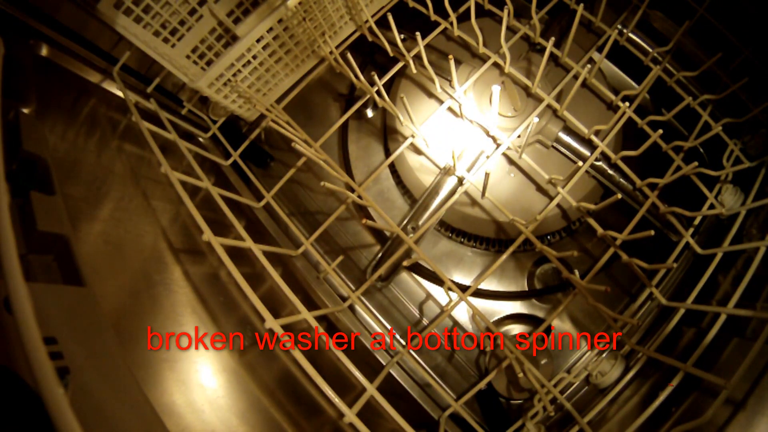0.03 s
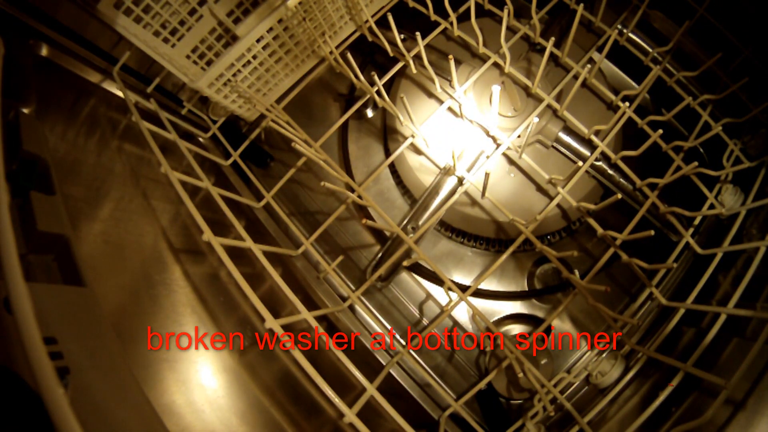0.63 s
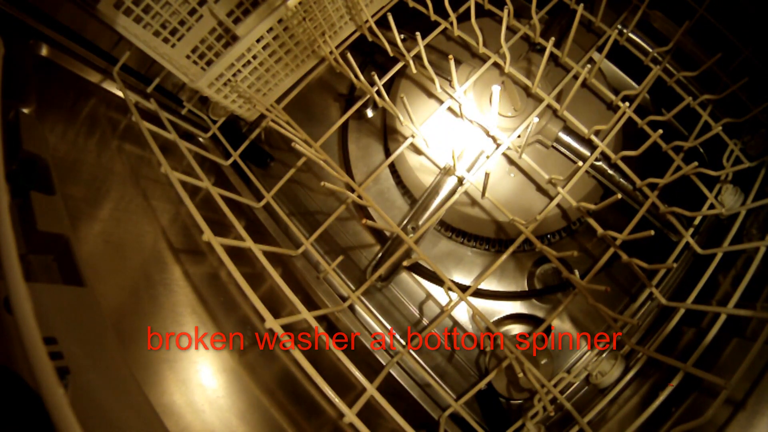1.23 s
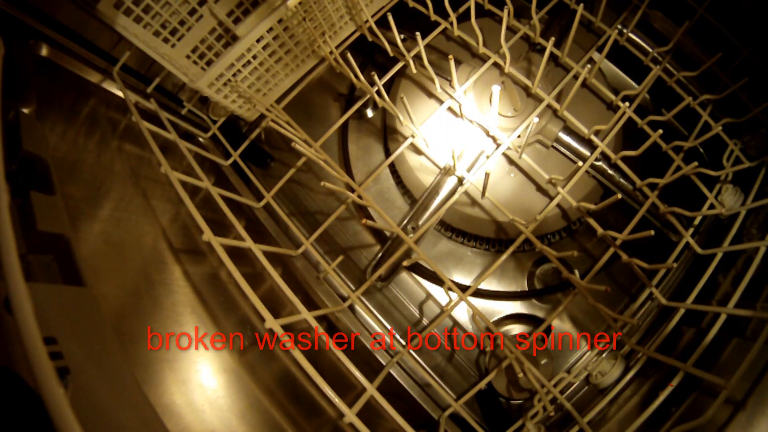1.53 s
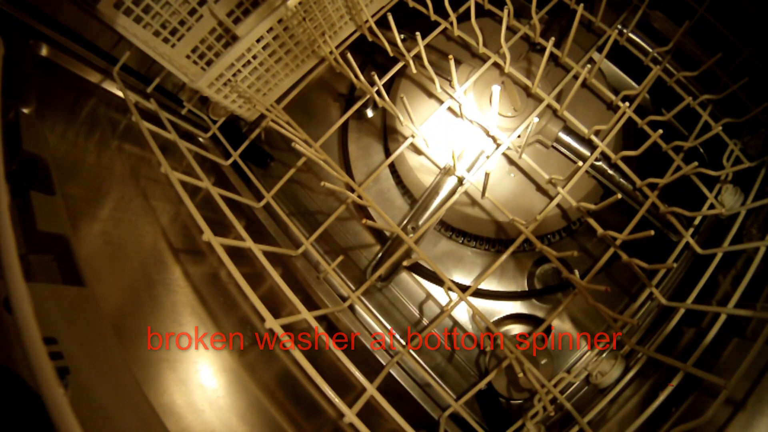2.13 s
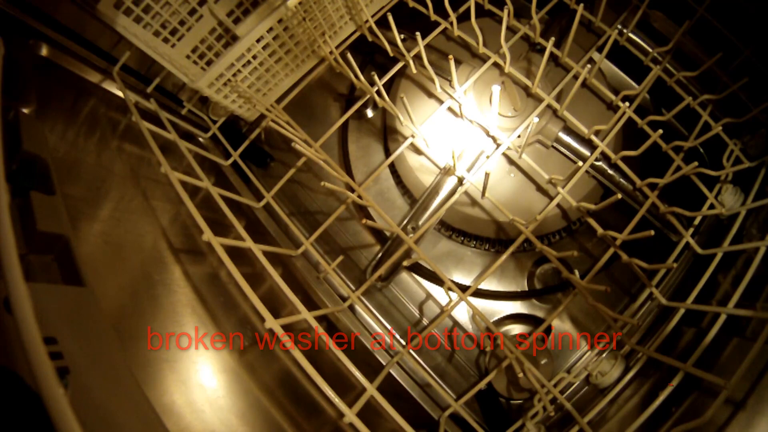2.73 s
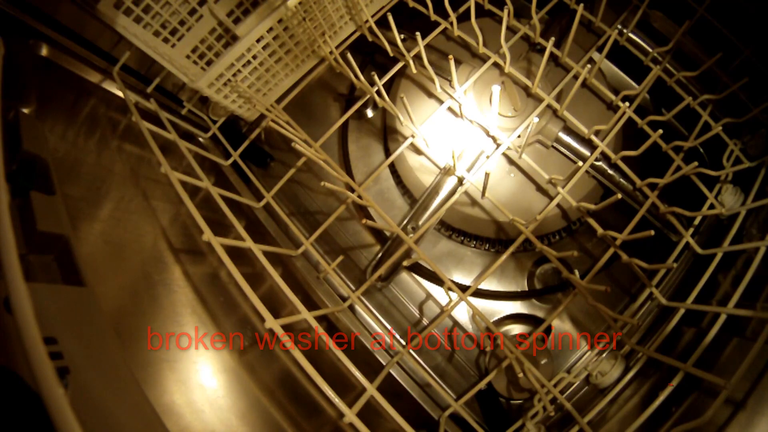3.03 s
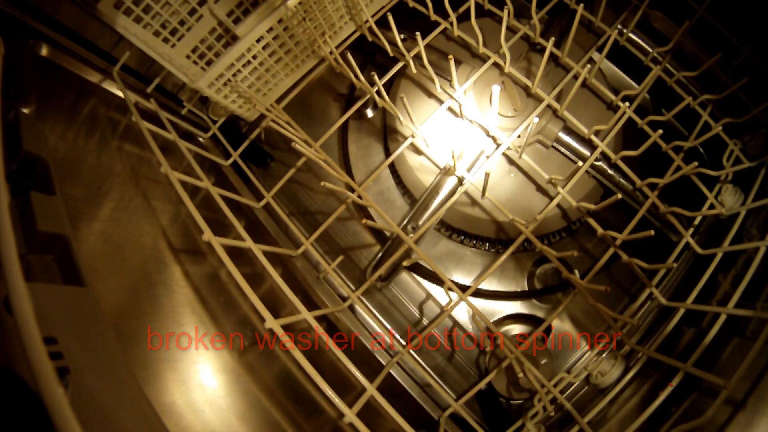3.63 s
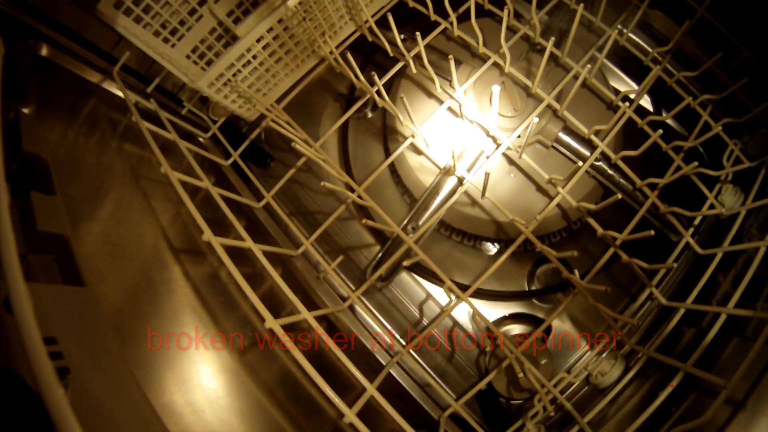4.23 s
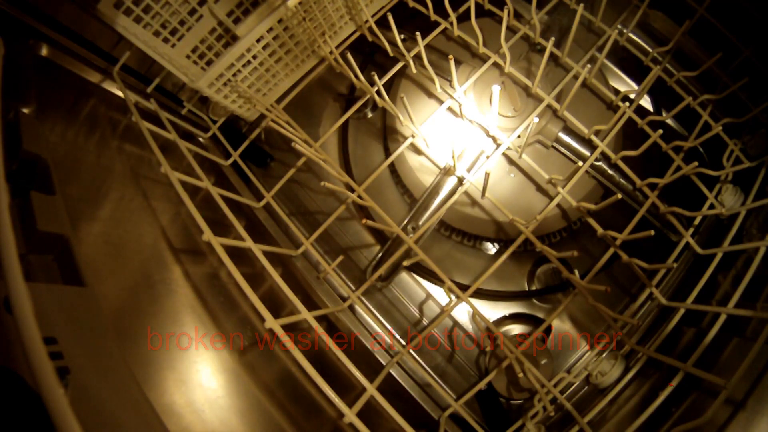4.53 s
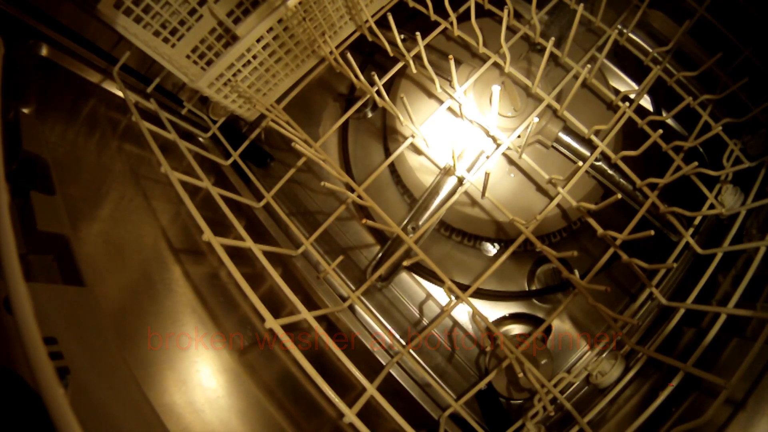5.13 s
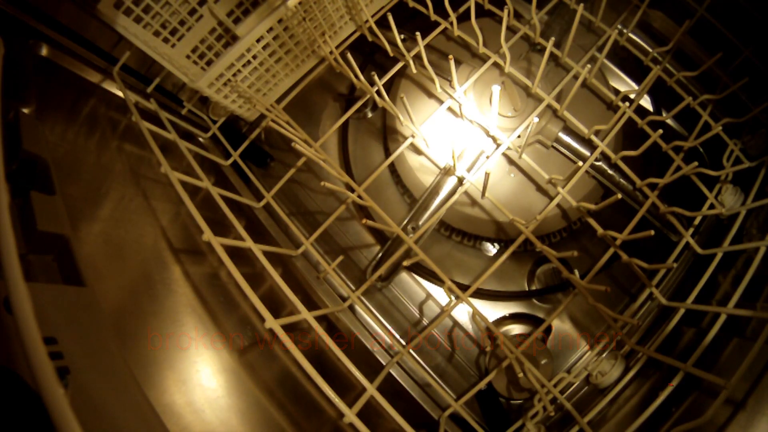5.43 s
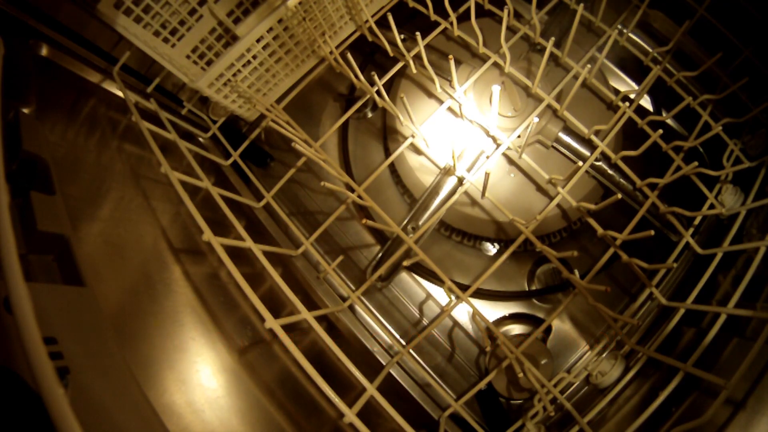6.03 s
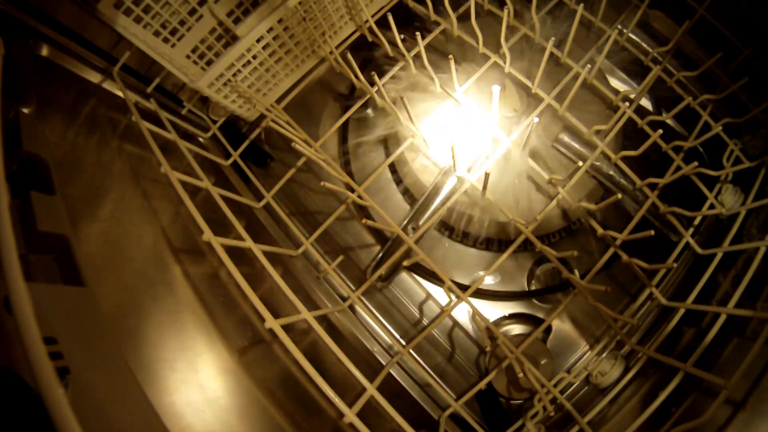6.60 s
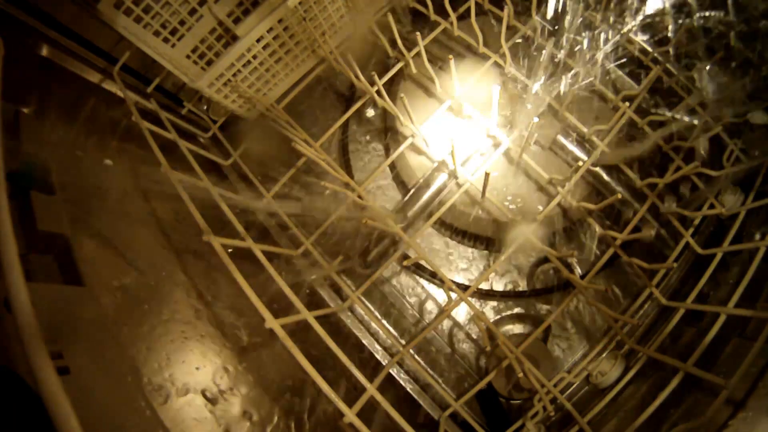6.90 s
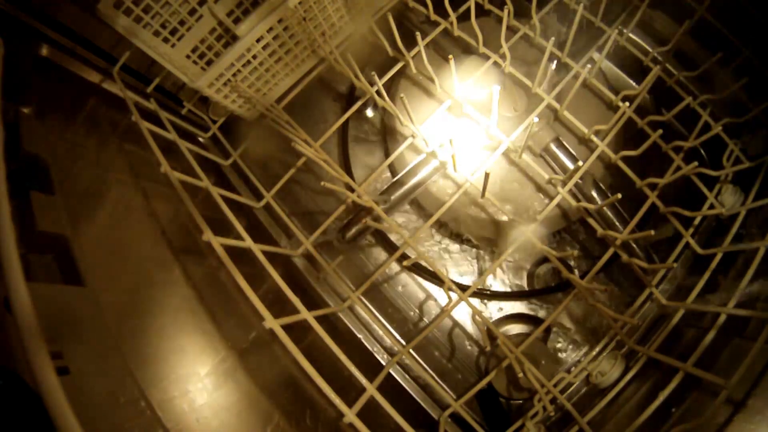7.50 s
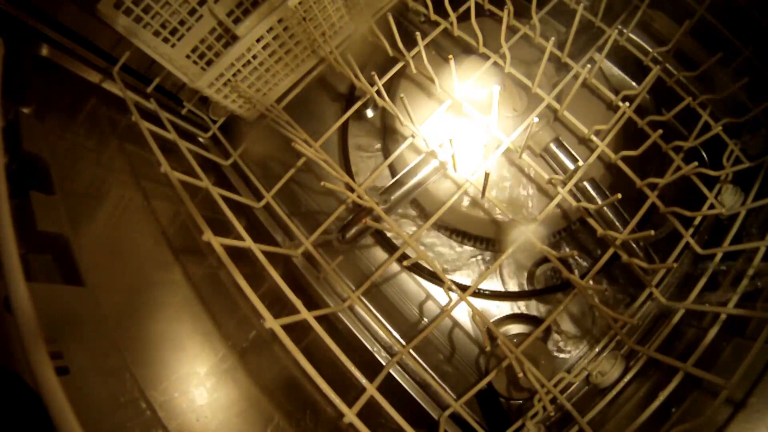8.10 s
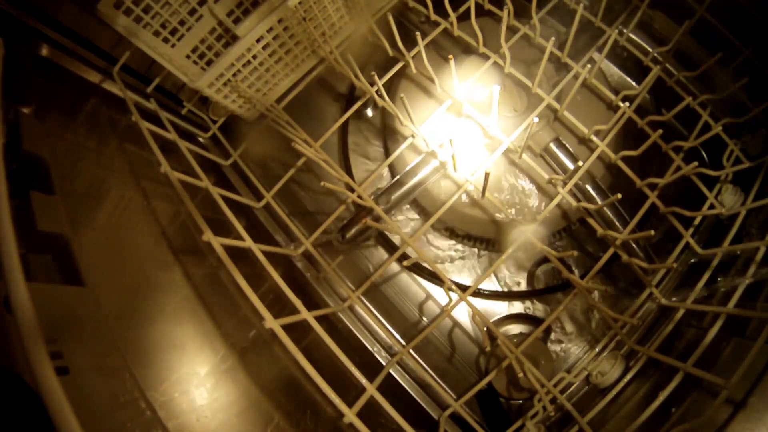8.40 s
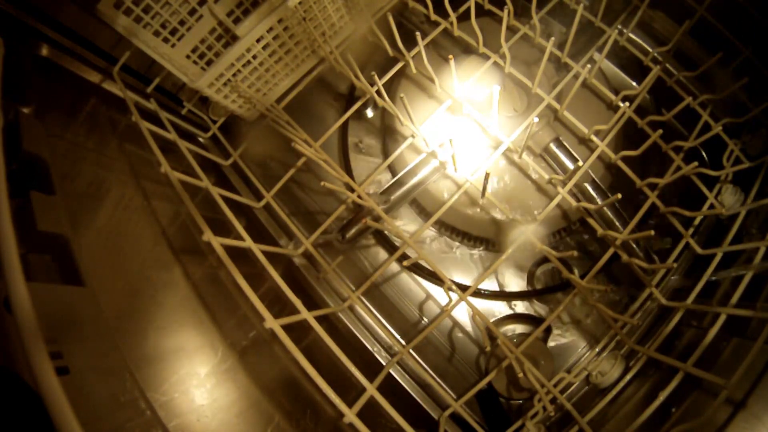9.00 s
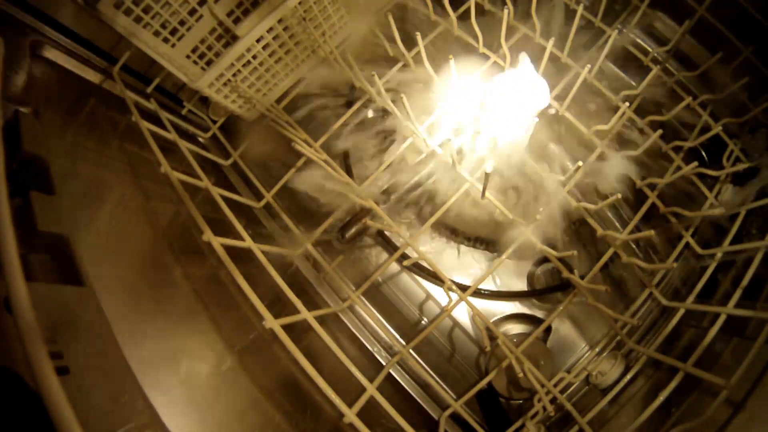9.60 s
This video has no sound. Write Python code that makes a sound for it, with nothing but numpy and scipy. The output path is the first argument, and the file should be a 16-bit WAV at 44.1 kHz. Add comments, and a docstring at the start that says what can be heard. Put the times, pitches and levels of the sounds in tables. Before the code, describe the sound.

Heard from a small microphone inside a dishwasher tub, a quiet hum and small plinking drips stop suddenly for a few seconds of near silence. Then the wash pump thumps on and water spits and surges loudly, spattering the racks and drumming on the steel. It eases into an even, slightly glassy spray over the droning pump, with a few hollow booms from the panels.

```python
"""Inside a steel dishwasher tub, water drips into the sump over a low hum; both stop abruptly at 3.9 s.
After a pause on faint hiss they return at 6.4 s, and the wash pump starts with a thump.
The jets spit and sweep across racks and walls, slam into the steel near 7 s, then settle to a
steady spray over the pump's drone. Throughout, a small camera in the tub samples the sound
coarsely, which mirrors it into a glassy treble."""
import sys
import numpy as np
from scipy import signal
from scipy.fft import rfft, irfft
from scipy.io import wavfile

SR = 44100
rng = np.random.default_rng(int(sys.argv[2]) if len(sys.argv) > 2 else 0)


def inscribe(sig):
    """Save sig as 16-bit PCM at rate SR to the path in sys.argv[1].

    A 1-D sig is mono; a 2-D sig holds one channel per row.
    Samples are clipped to [-1, 1] before scaling.
    """
    pcm = np.round(np.clip(np.atleast_2d(sig).T, -1, 1) * 32767)
    wavfile.write(sys.argv[1], SR, pcm.astype(np.int16))


N = 429975
TIME_S = np.arange(N) / SR

# Background spectra. Each row: frequency in Hz, relative level in dB.
HISS_SPECTRUM = [(30, 3.5), (70, -1), (150, -3.5), (400, -11.5), (1000, -16.5), (2500, -20), (5600, -24.5)]
RUMBLE_SPECTRUM = [(18, -15), (28, 3.5), (36, 1), (46, -8), (60, -12)]
IDLE_SPECTRUM = [(22, -5), (60, 1.5), (120, -0.5), (250, 1.5), (450, 0.5), (700, -3), (930, -7),
                 (1060, -16), (1350, -0.5), (1700, -15), (2100, -6.5), (2550, -17.5), (2800, -32),
                 (3300, -37), (5600, -24)]
# Tub resonances at idle. Each row: frequency in Hz, width in Hz, relative level in dB.
TUB_MODES = [(75.4, 2.7, 3.5), (918, 15, -8.5), (1250, 6.8, -9.5), (1426, 25, -16), (2200, 17, -15),
             (2460, 100, -3), (2568, 20, 0)]
# Idling motor. Each row: frequency in Hz, relative level in dB.
MOTOR_TONES = [(32.3, -69.5), (75.4, -55.5), (118.4, -67), (328.4, -68.5), (403.7, -64), (446.8, -68.5),
               (489.9, -82), (511.4, -73.5), (635.2, -69.5), (721.4, -80), (775.2, -84)]
# Drops into the sump. Each row: start in seconds, bubble pitch in Hz, relative level in dB.
DRIPS = [(0.176, 2470, -49.5), (0.269, 2570, -47), (0.314, 2190, -51), (0.416, 2260, -47),
         (0.427, 2600, -46), (0.553, 5200, -66.5), (0.608, 2200, -59.5), (0.905, 2410, -53.5),
         (1.017, 2560, -50.5), (1.105, 3300, -68), (1.215, 5130, -58), (1.393, 3160, -53),
         (1.631, 2800, -50.5), (1.687, 2580, -49.5), (1.77, 1880, -56), (1.886, 2300, -53.5),
         (1.943, 2210, -52), (2.033, 5006, -68), (2.135, 4661, -67), (2.43, 3750, -61.5),
         (2.48, 5050, -63.5), (2.527, 1510, -52), (2.567, 2550, -51.5), (2.6, 2196, -57.5),
         (2.99, 3460, -59.5), (3.295, 4737, -62.5), (3.37, 3560, -65), (3.405, 4166, -66),
         (3.448, 2460, -51), (3.49, 2160, -48), (3.762, 2730, -49), (3.846, 2920, -51.5),
         (6.433, 2360, -59.5), (8.381, 5404, -54), (8.577, 5230, -51), (8.755, 5400, -64),
         (8.908, 5270, -53), (9.568, 5400, -48)]
# Pump load, sagging as it gulps air. Each row: time in seconds, drone base level in dB.
PUMP_LOAD = [(7.3, -25.5), (7.35, -25.5), (8.08, -24.5), (9.51, -29.5), (9.7, -28.5), (9.75, -25)]
# Impeller harmonics. Each row: multiple of the rotation rate, relative level in dB.
PUMP_ORDERS = [(1, 0.5), (2, -8), (3, -11.5), (4, -7), (5, -14.5), (6, -19.5), (7, -23), (8, -20.5),
               (9, -22)]
# Jet flow, overshooting then settling. Each row: time in seconds, flow in dB above steady.
JET_FLOW = [(6.42, -47), (6.5, -18), (6.6, -1.5), (6.7, 5.5), (6.85, 8.5), (7.15, 6.5), (7.28, -1),
            (7.9, -0.5), (8.7, .5), (9.75, .5)]
# Water spectra. Each row: frequency in Hz, relative level in dB.
SURGE_SPECTRUM = [(22, -24), (32, -9), (45, 0), (65, -1), (100, -1), (160, -28)]
WALL_SPECTRUM = [(240, -18), (360, -7.5), (490, 0.5), (555, -2), (650, 2.5), (780, -3), (950, 0.5),
                 (1130, -15), (1500, -18)]
PANEL_SPECTRUM = [(45, -17), (75, -23), (110, -4), (150, 0), (200, -1), (260, -8), (400, -10.5)]
SPLASH_SPECTRUM = [(950, -25), (1110, -10), (1240, -1), (1630, 0.5), (1950, 1.5), (2400, -7), (3000, -35)]
PATTER_SPECTRUM = [(1120, -33), (1900, -12.5), (2030, -14.5), (2210, -1), (2530, 0), (3420, -16.5),
                   (4350, -23.5), (5330, -18), (5600, -20.5), (7280, -64), (12300, -120)]
CRACKLE_SPECTRUM = [(2500, -32), (3500, 0), (5000, 2), (7000, -9)]
# Resonances under the water. Each row: frequency in Hz, width in Hz, relative level in dB.
WALL_MODES = [(436, 14, 3), (464.4, 13, -2), (501, 12, -1.5), (628.4, 8.4, 4.5), (757, 4.3, -7),
              (921, 15, 3), (1055, 9.4, -26), (1621, 50, -2.5)]
PANEL_MODES = [(114.8, 4.2, 0), (171, 6.5, 1), (223, 11, -14.5), (286.7, 7.6, -5)]
SUMP_MODES = [(1619, 43, -2)]
RACK_MODES = [(2475, 86, 1.5), (2580, 54, -1)]
# Jets passing a panel. Each row: peak time in seconds, hold in seconds, pitch in Hz, level in dB.
PANEL_BOOMS = [(6.74, 0.12, 120, -14.5), (6.925, 0.016, 120, -18), (7.032, .004, 121, -17.5),
               (7.102, 0.0033, 125, -16.5), (8.665, 0.018, 117.5, -24), (8.67, 0.018, 175, -24),
               (8.939, 0.021, 116.5, -19.5), (8.985, 0.019, 171.4, -22), (9.07, .025, 173, -25.5),
               (9.195, .01, 116, -21), (9.52, .015, 171, -25.5), (9.65, 0.012, 175, -28)]
# Heavy slugs of water. Each row: peak time in seconds, level in dB.
SLUG_THUDS = [(6.965, -20), (7.14, -23.5), (7.2, -21), (7.3, -24)]
# Water landing in the sump. Each row: peak time in seconds, hold in seconds, level in dB.
SUMP_SPLASHES = [(6.71, .015, -32.5), (6.95, .11, -29), (7.08, 0.01, -24), (7.2, 0.0078, -28.5),
                 (7.37, .01, -25), (7.54, .02, -33.5), (7.649, 0.012, -31.5)]
# Jets crossing the racks. Each row: peak time in seconds, hold in seconds, level in dB.
RACK_SWEEPS = [(6.673, 0.0058, -22), (6.921, 0.095, -17.5), (7.22, 0.0067, -29.5), (7.329, .01, -30),
               (7.435, 0.014, -27.5), (7.54, .02, -32.5), (7.65, .015, -35.5), (9.713, .02, -32)]


def from_db(db):
    """Decibels to gain."""
    return 10 ** (np.asarray(db) / 20)


def unit_rms(x):
    """Scale to rms 1."""
    return x / np.sqrt(np.mean(x ** 2) + 1e-20)


def power_sum(*gains):
    """Joint gain of unrelated sounds."""
    return np.sqrt(sum(gain ** 2 for gain in gains))


def curve(rows):
    """Breakpoints interpolated to every sample."""
    return np.interp(TIME_S, *np.transpose(rows))


def swell(peak_s, rise_s, hold_s=0, fall_db_per_s=0):
    """Gain that rises smoothly to 1, holds, then falls at the given rate."""
    rise = np.clip(1 + (TIME_S - peak_s) / rise_s, 0, 1)
    falling_s = np.clip(TIME_S - peak_s - hold_s, 0, 2)
    return np.sin(np.pi / 2 * rise) ** 2 * from_db(-fall_db_per_s * falling_s)


def noise():
    """White noise."""
    return rng.standard_normal(N)


def drift(rate_hz, knots=8192):
    """Smooth random wander; rms 1."""
    hz = np.arange(knots // 2 + 1) * SR / N
    slow = irfft(rfft(rng.standard_normal(knots)) / (1 + (hz / rate_hz) ** 2), knots)
    return np.interp(TIME_S, np.linspace(0, N / SR, knots), unit_rms(slow))


def impacts(per_s, spread_db):
    """Drops of uneven size landing at random; rms 1."""
    sizes = from_db(spread_db * np.minimum(rng.exponential(1, N), 4)) * rng.choice([-1, 1], N)
    return unit_rms(sizes * (rng.random(N) < per_s / SR))


def colour(x, spectrum):
    """Filter by a spectrum, with steep skirts past its ends; rms 1."""
    hz = np.maximum(np.arange(N // 2 + 1) * SR / N, 1)
    points_hz, points_db = np.transpose(spectrum)
    skirts = np.minimum(1, np.minimum(hz / points_hz[0], points_hz[-1] / hz)) ** 6
    gain = from_db(np.interp(np.log(hz), np.log(points_hz), points_db))
    return unit_rms(irfft(rfft(x) * skirts * gain, N))


def resonate(x, modes):
    """Parallel two-pole resonances; rms 1."""
    out = 0
    for hz, width_hz, db in modes:
        radius = np.exp(-np.pi * width_hz / SR)
        feedback = [1, -2 * radius * np.cos(2 * np.pi * hz / SR), radius ** 2]
        out += from_db(db) * unit_rms(signal.lfilter([1, 0, -1], feedback, x))
    return unit_rms(out)


def tub(x, direct_db, t60_s=0.29):
    """Direct sound plus dense, short reflections off the steel walls."""
    t = TIME_S[:SR // 2]
    echoes = rng.standard_normal(len(t)) * from_db(-60 * t / t60_s)
    echoes /= np.linalg.norm(echoes)
    echoes[0] += from_db(direct_db)
    return signal.fftconvolve(x, echoes / np.linalg.norm(echoes))[:len(x)]


def background(hiss_db=-61, rumble_db=-60):
    """Constant faint hiss and rumble."""
    hiss = from_db(hiss_db) * colour(noise(), HISS_SPECTRUM)
    return hiss + from_db(rumble_db) * colour(noise(), RUMBLE_SPECTRUM)


def idle(rush_db=-58, ring_db=-59.5, tone_trim_db=-1, waver=0.35):
    """Motor tones, the upper ones wavering more, over a soft rush and the tub's resonances."""
    rush = from_db(rush_db) * colour(tub(noise(), direct_db=-3.5), IDLE_SPECTRUM)
    hum, top_hz = 0, MOTOR_TONES[-1][0]
    for hz, db in MOTOR_TONES:
        shake = 1 + waver * np.sqrt(hz / top_hz) * drift(rate_hz=7)
        hum += from_db(db + tone_trim_db) * shake * np.sin(2 * np.pi * (hz * TIME_S + rng.random()))
    return np.sqrt(2) * hum + rush + from_db(ring_db) * resonate(noise(), TUB_MODES)


def drips(decay_cycles=3.54, glide=0.023, trim_db=-0.5, splat_db=-19):
    """Each drop traps a bubble that rings a few cycles, rising in pitch, with a short bright splat."""
    out, t = np.zeros(N + SR), TIME_S[:SR // 3]
    splat_band = signal.butter(2, [2500, 4600], "band", fs=SR, output="sos")
    for start_s, hz, db in DRIPS:
        age = t * hz / decay_cycles
        pitch_hz = hz * (1 + glide * (0.5 - np.exp(-age)))
        bubble = np.sin(2 * np.pi * np.cumsum(pitch_hz) / SR)
        splat = from_db(splat_db) * unit_rms(signal.sosfilt(splat_band, rng.standard_normal(len(t))))
        envelope = (1 - np.exp(-2 * age)) * np.exp(-age)
        plink = tub((bubble + splat) * envelope, direct_db=-19)
        start = round(start_s * SR)
        out[start:start + len(t)] += from_db(db + trim_db) * plink / np.std(plink[:SR // 25])
    return out[:N]


def motor_jolt(mains_hz=60, level_db=-24, buzz_db=-11):
    """The pump motor kicks at mains frequency as it starts."""
    phase = 2 * np.pi * mains_hz * TIME_S
    buzz = np.sin(2 * phase) + np.sin(4 * phase) / 2
    kick = from_db(level_db) * swell(peak_s=6.495, rise_s=0.041, hold_s=0.018, fall_db_per_s=280)
    return np.sqrt(2) * kick * (np.sin(phase) + from_db(buzz_db) * buzz)


def pump(rotation_hz=58.4, wobble_hz=0.433, flutter=0.21, primed_s=7.27):
    """Impeller drone once the pump has filled; churning water shakes the upper orders most."""
    turns = np.cumsum(rotation_hz + wobble_hz * drift(rate_hz=5.32)) / SR
    drone = 0
    for order, db in PUMP_ORDERS:
        shake = 1 + flutter * min(order / 3, 1) * drift(rate_hz=3.5)
        drone += from_db(db) * shake * np.sin(2 * np.pi * (order * turns + rng.random()))
    return np.sqrt(2) * from_db(curve(PUMP_LOAD)) * drone * swell(primed_s, rise_s=0.19)


def panel_booms(roughness=0.082):
    """A panel hums on one mode while a jet plays on it."""
    out = 0
    for peak_s, hold_s, hz, db in PANEL_BOOMS:
        tone = np.sqrt(2) * np.sin(2 * np.pi * (hz * (TIME_S - peak_s) + rng.random()))
        out += from_db(db) * swell(peak_s, rise_s=0.036, hold_s=hold_s, fall_db_per_s=260) * tone
    return out * (1 + roughness * drift(rate_hz=27))


def surge(flow_db, steady_db=-36.5):
    """Deep rumble of moving water, with a thud per heavy slug."""
    thuds = [from_db(db) * swell(peak_s, rise_s=0.044, hold_s=0.015, fall_db_per_s=200)
             for peak_s, db in SLUG_THUDS]
    return power_sum(from_db(steady_db + 0.36 * flow_db), *thuds) * colour(noise(), SURGE_SPECTRUM)


def slam(level_db, fall_db_per_s):
    """Gain of a part struck by the full jet."""
    return from_db(level_db) * swell(6.972, rise_s=0.0091, hold_s=0.095, fall_db_per_s=fall_db_per_s)


def steel(flow_db, wall_db=-39, panel_db=-35, wall_ring_db=-3.5, panel_ring_db=-1):
    """Slugs of water wash the walls and drum on the large panels, which ring longer after the slam."""
    slugs = impacts(per_s=2500, spread_db=3)
    walls = colour(tub(slugs, direct_db=5.5), WALL_SPECTRUM)
    walls += from_db(wall_ring_db) * resonate(noise(), WALL_MODES)
    panels = colour(slugs, PANEL_SPECTRUM) + from_db(panel_ring_db) * resonate(noise(), PANEL_MODES)
    load_db = curve(PUMP_LOAD)
    gulp_db = load_db.max() - load_db   # air makes the jets lumpy: more drumming
    wash = from_db(wall_db + flow_db)
    drum = from_db(panel_db + 0.59 * flow_db + gulp_db)
    walls *= power_sum(wash, slam(level_db=-21.5, fall_db_per_s=60))
    panels *= power_sum(drum, slam(level_db=-23, fall_db_per_s=44))
    return walls + panels


def bubbles(per_s=1200, sizes=8, low_hz=1150, high_hz=2450):
    """Small bubbles, each ringing a few cycles; rms 1."""
    births = impacts(per_s, spread_db=4)
    size_of_birth = rng.integers(0, sizes, N)
    out = 0
    for size, hz in enumerate(np.geomspace(low_hz, high_hz, sizes)):
        out += resonate(births * (size_of_birth == size) + 1e-18, [(hz, hz / 8, 0)])
    return unit_rms(out)


def sump(flow_db, steady_db=-40.5, steady_ring_db=-9, splash_ring_db=-3):
    """Falling water traps bubbles and rings the pool, splashes more than the steady fall."""
    steady = from_db(steady_db + 1.3 * flow_db)
    splashes = power_sum(*(from_db(db) * swell(peak_s, rise_s=0.062, hold_s=hold_s, fall_db_per_s=124)
                           for peak_s, hold_s, db in SUMP_SPLASHES))
    fizz = colour(tub(bubbles(), direct_db=-1), SPLASH_SPECTRUM)
    ring_gain = power_sum(from_db(steady_ring_db) * steady, from_db(splash_ring_db) * splashes)
    return power_sum(steady, splashes) * fizz + ring_gain * resonate(noise(), SUMP_MODES)


def spray(gain, crackle_db=-12):
    """Fine drops patter; as a jet nears, its crisp direct hits grow faster than the rest."""
    patter = colour(tub(impacts(per_s=7000, spread_db=2), direct_db=8), PATTER_SPECTRUM)
    crackle = colour(impacts(per_s=2500, spread_db=2.5), CRACKLE_SPECTRUM)
    nearness = (gain / gain.max()) ** 0.73
    return gain * (patter + from_db(crackle_db) * nearness * crackle)


def racks(flow_db, steady_db=-38, ring_db=-9, spatter_db=0.74, fall_db_per_s=115):
    """Spray on the racks follows the flow unevenly and flares in each sweep; spray and slam ring them."""
    sweeps = [from_db(db) * swell(peak_s, rise_s=0.053, hold_s=hold_s, fall_db_per_s=fall_db_per_s)
              for peak_s, hold_s, db in RACK_SWEEPS]
    steady = from_db(steady_db + 1.53 * flow_db + spatter_db * drift(rate_hz=14))
    gain = power_sum(steady, *sweeps)
    ring_gain = power_sum(from_db(ring_db) * gain, slam(level_db=-24.5, fall_db_per_s=fall_db_per_s))
    return spray(gain) + ring_gain * resonate(noise(), RACK_MODES)


def jets(sputter_db=0.38, opening_s=0.05):
    """One flow drives four water sounds; the jets break up unevenly, so all sputter together."""
    flow_db = curve(JET_FLOW)
    water = racks(flow_db) + sump(flow_db) + steel(flow_db) + surge(flow_db)
    onset = swell(JET_FLOW[0][0] + opening_s, opening_s)
    return water * from_db(sputter_db * drift(rate_hz=40)) * onset


def scene(stop_s=3.908, restart_s=6.425, fade_s=0.004):
    """Hum and drips, a pause, then both again under the wash; mono."""
    floor = background()
    wash = motor_jolt() + pump() + jets() + panel_booms()
    pause_gate = np.interp(TIME_S, [stop_s - fade_s, stop_s, restart_s, restart_s + fade_s], [1, 0, 0, 1])
    return (floor + (idle() + drips()) * pause_gate + wash)[None]


def record(dry, rate_hz=12000, band_hz=5800, full_scale=0.8, soften_hz=17000, cutoff_hz=15300):
    """The camera holds each coarse sample until the next, mirroring the band around its sampling rate."""
    band = signal.sosfilt(signal.butter(8, band_hz, fs=SR, output="sos"), dry)
    samples = np.clip(signal.resample_poly(band, rate_hz, SR, axis=1), -full_scale, full_scale)
    held = signal.resample_poly(np.repeat(samples, 8, axis=1), SR, 8 * rate_hz, axis=1)[:, :N]
    soft = signal.sosfilt(signal.butter(1, soften_hz, fs=SR, output="sos"), held)
    return signal.sosfilt(signal.ellip(12, 0.2, 90, cutoff_hz, fs=SR, output="sos"), soft)


dry = scene()
out = record(dry)
inscribe(out)
```